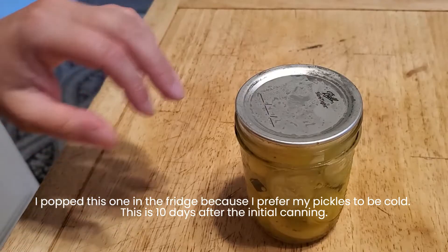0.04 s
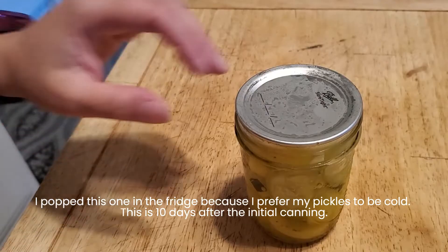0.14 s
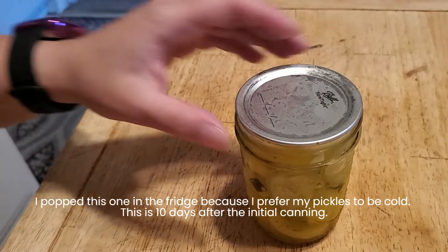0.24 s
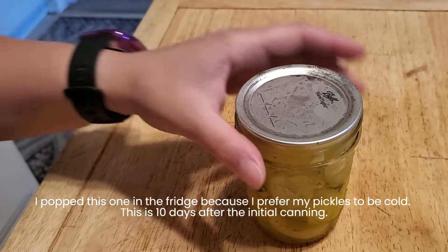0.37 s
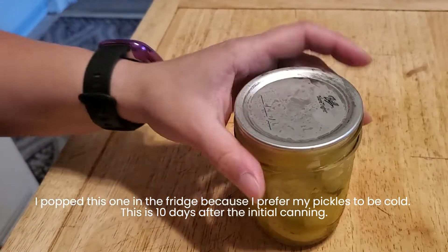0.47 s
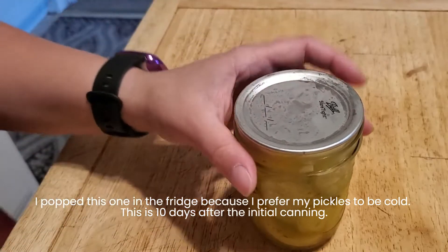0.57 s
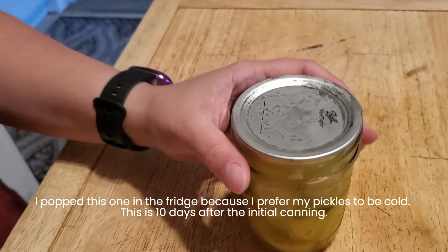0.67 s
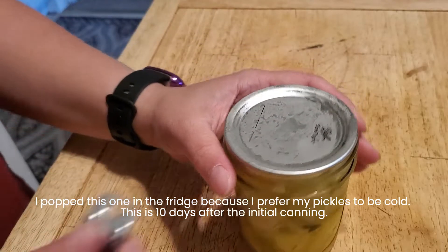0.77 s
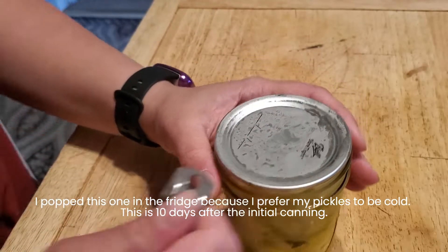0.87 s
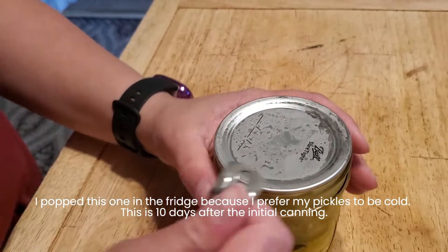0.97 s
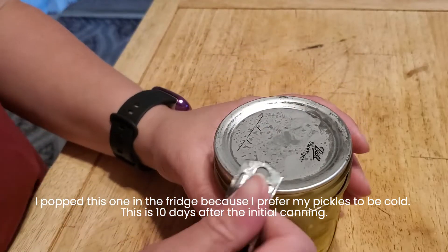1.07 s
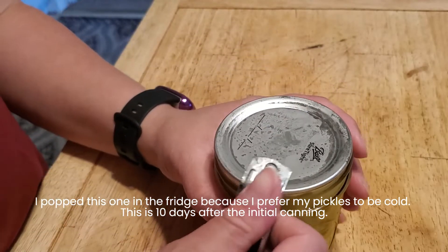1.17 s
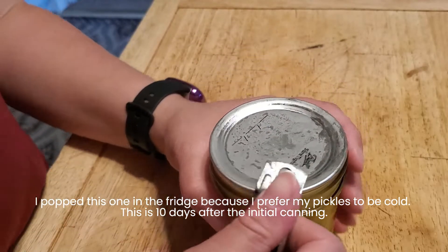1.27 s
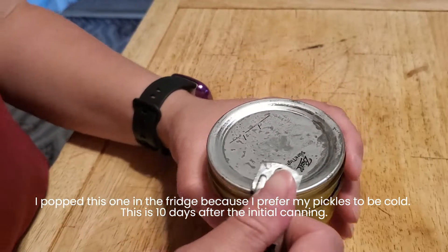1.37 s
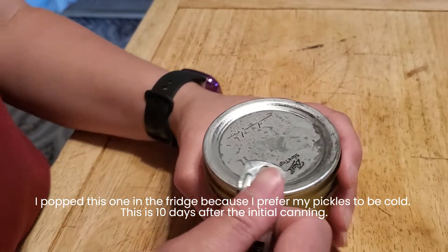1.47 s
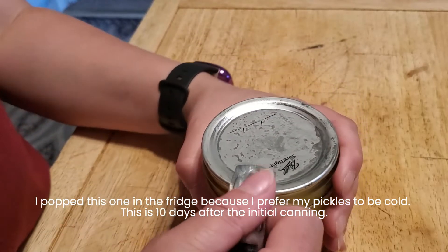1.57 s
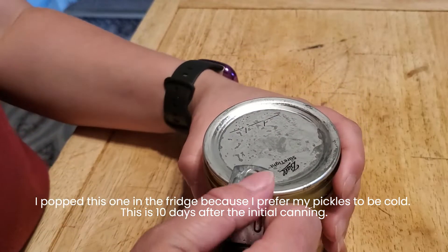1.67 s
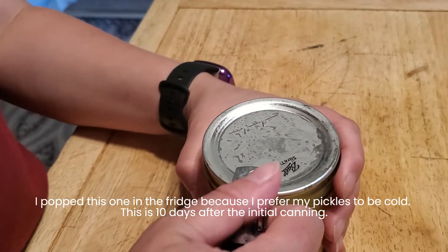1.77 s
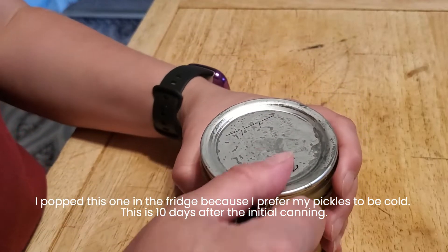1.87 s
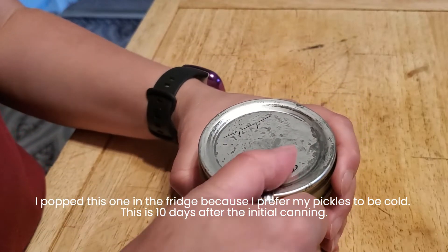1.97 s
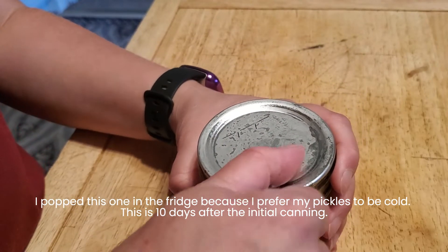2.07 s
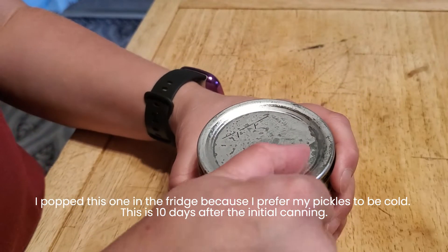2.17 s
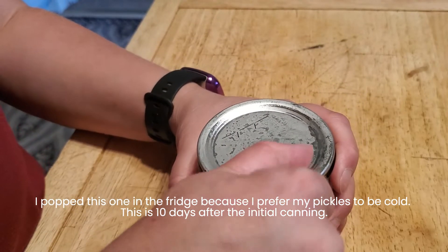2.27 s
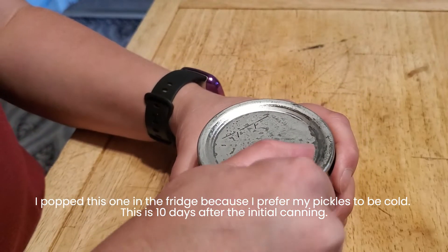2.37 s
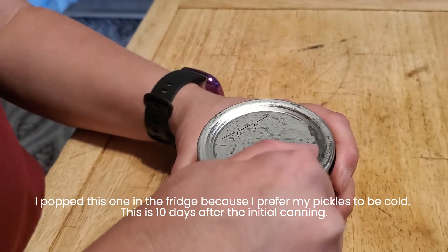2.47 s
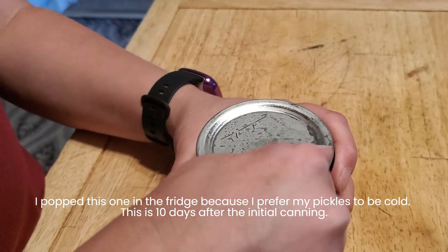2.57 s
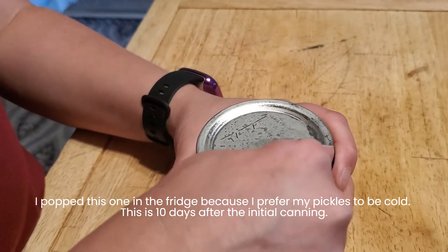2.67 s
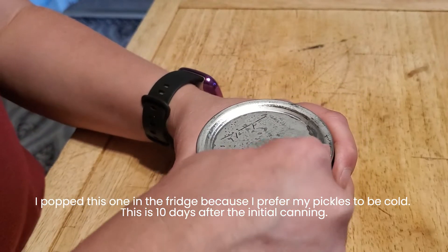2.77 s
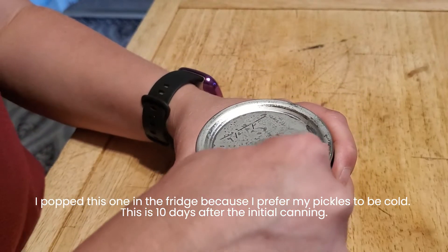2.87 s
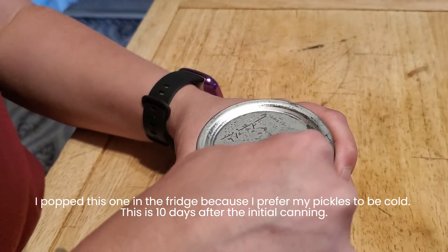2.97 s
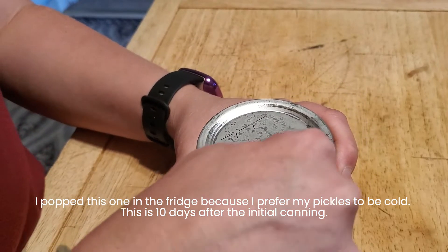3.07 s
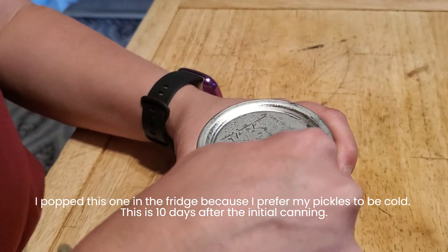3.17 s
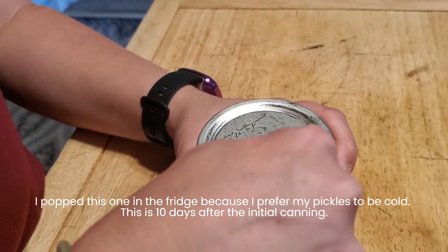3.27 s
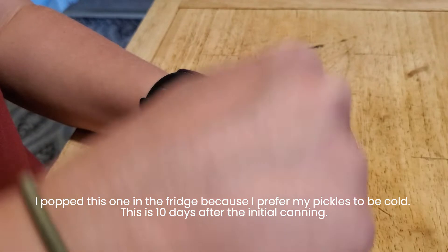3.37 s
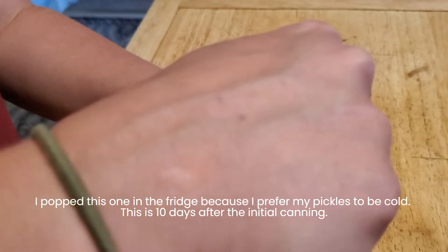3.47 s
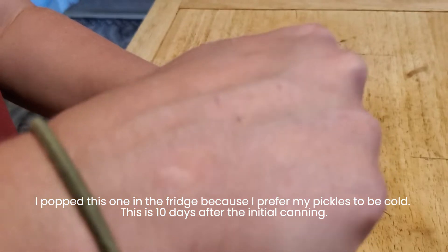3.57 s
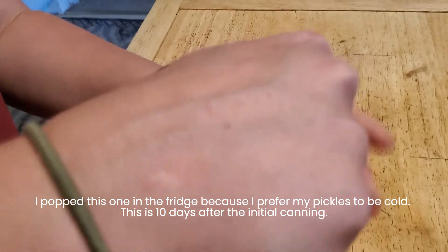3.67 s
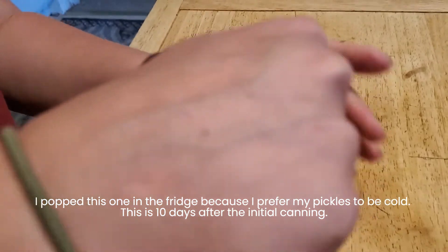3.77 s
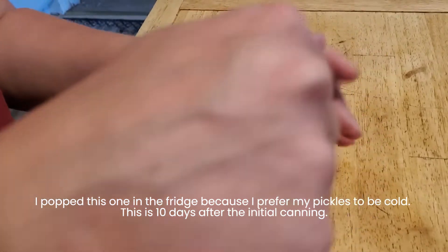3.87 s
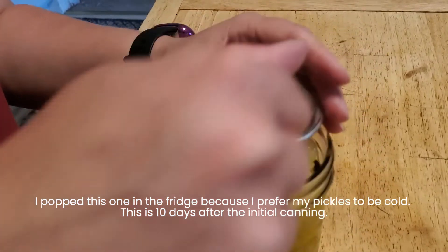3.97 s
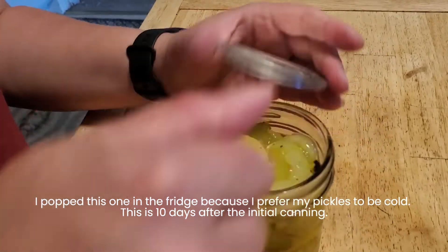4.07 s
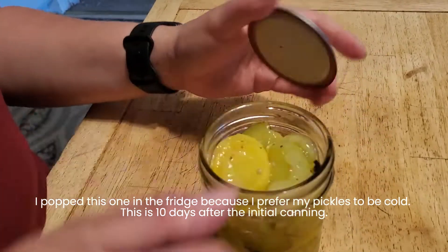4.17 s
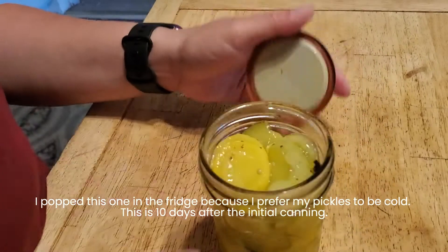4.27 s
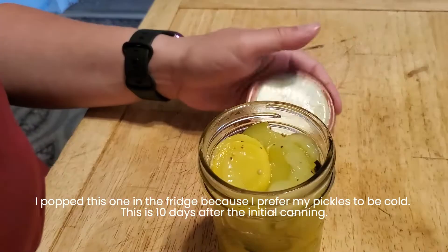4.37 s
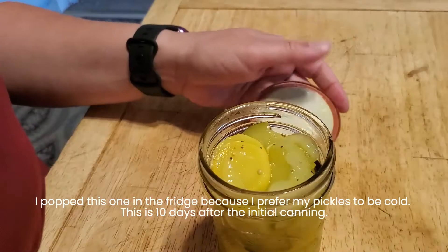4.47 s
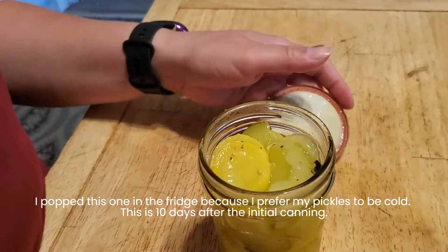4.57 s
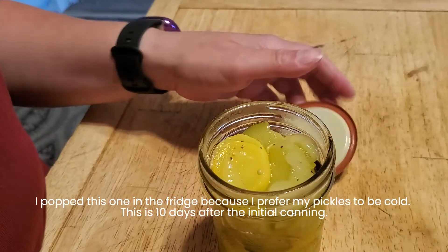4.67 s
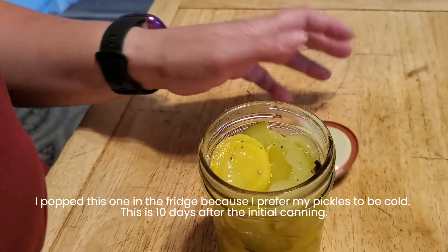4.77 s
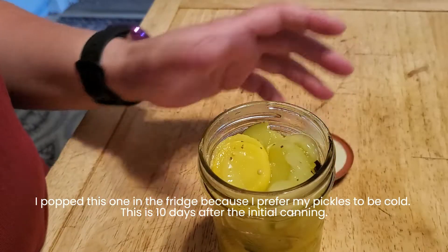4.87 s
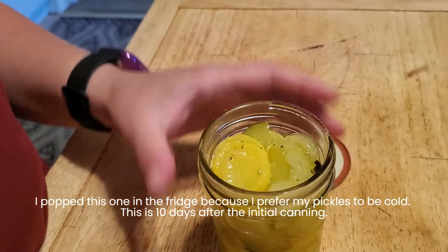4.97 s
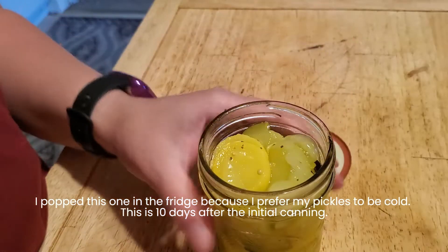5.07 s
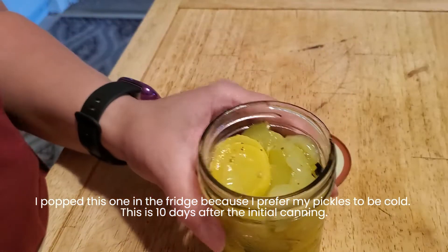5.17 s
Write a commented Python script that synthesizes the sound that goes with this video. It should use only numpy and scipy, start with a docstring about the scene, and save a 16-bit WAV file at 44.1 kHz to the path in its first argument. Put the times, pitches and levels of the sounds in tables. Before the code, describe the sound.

A steel opener clicks and scrapes on a glass jar's lid, which squeaks, pops open, then clatters on the rim and wobbles on wood.

```python
"""Cloth rustles, dull knocks and metal clicks follow, then a jar opens with a hiss, a squeak and a low pop.
A steel opener pries at the lid of a glass jar on a wooden table in a small kitchen, slipping on the rim.
The freed thin lid clatters on the glass, then wobbles on the table.
Knocks are short noise bursts plus ringing sine waves; rubbing and hissing are grainy noise;
the squeak is one sine wave with an unsteady, falling pitch. A low rush of noise lies under everything."""
import sys
import numpy as np
from scipy import signal
from scipy.fft import rfft, irfft, next_fast_len
from scipy.io import wavfile
from scipy.ndimage import map_coordinates

SR = 44100
rng = np.random.default_rng(int(sys.argv[2]) if len(sys.argv) > 2 else 0)


def master(y):
    """Save y as 16-bit WAV."""
    cut = np.clip(np.atleast_2d(y).T, -1, 1)
    pcm = np.round(cut * 32767)  # scale
    wavfile.write(sys.argv[1], SR, pcm.astype(np.int16))


N = 230773
TIME = np.arange(N) / SR  # s
AGE = np.arange(SR) / SR  # time since a blow, s

# Ringing notes of the lid: (frequency [Hz], level struck on glass [dB], level lying on wood [dB],
# time to fall 60 dB before each surface shortens it [s])
LID_MODES = [(838, -11, -22, .35), (1322, -15, -18, .35), (2048, -8, -30, .45), (2125, -4, -26, .4),
             (2168, -5, -20, .4), (2284, -8, -18, .3), (2668, -10, -6, .22), (2778, -11, -3, .22),
             (2898, -16, -7, .18), (3008, -11, -16, .4), (3140, 0, 0, .42), (3561, -9, -18, .5),
             (3707, -8, -16, .35), (4557, -8, -23, .38), (5175, -7, -22, .42), (5570, -4, -15, .3),
             (8183, -22, -36, .35), (8295, -20, -36, .38), (9422, -24, -40, .3), (10211, -16, -35, .36),
             (11932, -21, -32, .22), (13386, -20, -36, .22), (14567, -19, -38, .2)]
# Tone colour of the jar's dull sounds: (frequency [Hz], relative level [dB])
JAR_COLOUR = [(41, -34), (70, 2.5), (360, 2.5), (761, -5.5), (1340, -11.5), (1850, -23), (2480, -19.5),
              (2910, -34), (3570, -30.5), (5370, -47), (6750, -47), (14900, -63.5), (16000, -63.5)]
# Tone colour of rushing air, also lent to tiny cloth cracks: (frequency [Hz], relative level [dB])
AIR_COLOUR = [(900, -30.5), (2000, -11), (3000, -2), (4200, -10.5), (6600, -6), (7600, -16), (9000, -10),
              (11300, -14), (14000, -3.5), (16000, -7)]


def amp(db):
    """Turn decibels into gain."""
    return 10 ** (np.asarray(db) / 20)


def unit(x):
    """Scale x to an average strength (rms) of 1."""
    return x / np.sqrt(np.mean(x ** 2) + 1e-20)


def along(points, hz):
    """Read a curve of (frequency, value) points on a logarithmic frequency axis."""
    f, v = np.transpose(points)
    return np.interp(np.log(hz + 1), np.log(f + 1), v)


def waver(rate):
    """Draw a smooth random curve with this many random points a second."""
    knots = rng.standard_normal(int(N * rate / SR) + 4)
    return map_coordinates(knots, [TIME * rate])


def add(track, s, sound):
    """Mix a sound into the track from time s, in seconds."""
    start = max(round(s * SR), 0)
    part = sound[..., :max(N - start, 0)]
    track[:, start:start + part.shape[-1]] += part


def filtered(x, response):
    """Reshape x by a complex gain that depends on frequency."""
    m = next_fast_len(N + SR // 4)
    return irfft(rfft(x, m) * response(np.fft.rfftfreq(m, 1 / SR)), m)[:, :N]


def noise(colour, size=N, band=(20, SR)):
    """Coloured stereo noise of rms 1 in a soft-edged band; the bass is nearly the same on both sides."""
    # Likeness of left and right: (frequency [Hz], likeness [0 to 1])
    likeness = [(60, 0.97), (250, .97), (500, 0.61), (1000, 0.6), (3000, 0.27), (8000, 0.15)]
    m = next_fast_len(size)
    hz = np.fft.rfftfreq(m, 1 / SR)
    turn = np.arccos(np.clip(along(likeness, hz), -1, 1)) / 2
    gain = amp(along(colour, hz))
    gain = gain / (1 + (band[0] / (hz + 1)) ** 6) / (1 + (hz / band[1]) ** 6)
    shares = np.array([np.cos(turn), np.sin(turn)])
    mid, side = irfft(rfft(rng.standard_normal((2, m))) * gain * shares, m)[:, :size]
    return unit(np.array([mid + side, mid - side]))


def burst(colour, band, t60, rise):
    """Many crowded, quickly damped vibrations: noise that starts fast and dies away."""
    t = AGE[:SR // 4]
    fade = amp(-60 * t / t60) * (1 - np.exp(-t / rise))
    return unit(noise(colour, size=len(t), band=band) * fade) * np.sqrt(np.mean(fade ** 2))


def ring(modes, scatter_db, detune, spread):
    """Freely fading sine waves; strengths, pitches and left-right phases vary from blow to blow."""
    hz, db, t60 = np.transpose(modes)[:, :, None]
    luck = rng.standard_normal((3, len(modes), 1))
    gain = amp(db + scatter_db * luck[0])
    gain = gain / np.sqrt(np.sum(gain ** 2) / 2)
    fade = gain * amp(-60 * AGE / t60) * (1 - np.exp(-AGE / 0.00023))
    phase = 2 * np.pi * hz * (1 + detune * luck[1]) * AGE + rng.uniform(0, 2 * np.pi, hz.shape)
    return np.array([np.sum(fade * np.sin(phase + side * spread * luck[2]), 0) for side in (1, -1)])


def contacts(rows, colour, modes, clack_t60, thud_t60, tick_t60, crack_t60, crack_db, wood_db, choke_db,
             detune):
    """Each blow thuds, clacks, ticks and cracks; the struck thing rings until later blows choke it.

    Rows: (time [s], clack [dB], thud [dB], tick [dB], ring relative to clack [dB])."""
    # Ringing notes of the table top: (frequency [Hz], level [dB], time to fall 60 dB [s])
    wood_modes = [(171, -2, .14), (322, -4, .09), (431, 4, .12), (539, 1, .17), (660, -4, .11)]
    rebound = .008  # s within which a rebound belongs to the same blow
    out, rows = np.zeros((2, N)), np.array(list(rows))
    low, middle, high, top = (50, 800), (800, 3700), (4200, 9000), (8500, SR)  # Hz
    for s, clack, thud, tick, ring_db in rows:
        add(out, s, amp(thud) * burst(colour, low, thud_t60, rise=0.00052))
        add(out, s, amp(thud + wood_db) * ring(wood_modes, scatter_db=6.0, detune=0.014, spread=.1))
        add(out, s, amp(clack) * burst(colour, middle, clack_t60, rise=0.0017))
        add(out, s, amp(tick) * burst(colour, high, tick_t60, rise=0.001))
        add(out, s, amp(tick + crack_db) * burst(colour, top, crack_t60, rise=.0002))
        # Number of later blows so far
        later = np.searchsorted(rows[rows[:, 0] > s + rebound, 0], s + AGE)
        ring_gain = amp(clack + ring_db + choke_db * later)
        add(out, s, ring_gain * ring(modes, scatter_db=3, detune=detune, spread=.5))
    return out


def strokes(rows):
    """Gain of movements that gather speed and come to rest; rows as (time [s], dB, swell [s], fade [s])."""
    power = np.zeros(N)
    for s, db, swell, fade in rows:
        width = np.where(TIME < s, swell, fade)
        power += (amp(db) * np.exp(-((TIME - s) / width) ** 2)) ** 2
    return np.sqrt(power)


def rub(gain, colour, grain_rate, grain_db):
    """Friction or rushing air: noise broken up by quick random changes in level."""
    return gain * unit(noise(colour) * amp(grain_db * waver(grain_rate)))


def follow(clack, typical_db, share):
    """A level that is typical_db for an ordinary tap and changes by a share of the tap's extra strength."""
    tap_db = -20  # clack of an ordinary tap
    return typical_db + share * (clack - tap_db)


def dragging(s, db, rise, t60):
    """Gain of an edge that stays in touch after each tap and slows down."""
    power = np.zeros((1, N))
    for start, strength in zip(s, db):
        add(power, start, (amp(strength - 60 * AGE / t60) * (1 - np.exp(-AGE / rise))) ** 2)
    return np.sqrt(power)


def arm():
    """Cloth rustles and catches with a tiny crack as the arm reaches for the jar."""
    # Reaching movements: (time at the fastest [s], rustle [dB], swell [s], fade [s])
    reaches = [(.29, -51.5, 0.019, 0.024), (.42, -58.5, 0.9, 0.27), (.42, -52.5, 0.0065, 0.084),
               (.85, -57, 0.35, 0.21), (.92, -58.5, 0.16, 0.026)]
    # Cloth catching: (time [s], level [dB])
    snags = [(0.263, -45), (0.284, -38.5), (0.296, -48), (0.332, -46), (0.412, -46)]
    # Tone colour of cloth: (frequency [Hz], relative level [dB])
    cloth_colour = [(290, -42.5), (500, -4.5), (698, 2), (1130, -10.5), (2390, -9.5), (6510, -19.5),
                    (7640, -25.5), (14900, -22.5), (16000, -26)]
    out = rub(strokes(reaches), cloth_colour, grain_rate=250, grain_db=1.0)
    for s, db in snags:
        add(out, s, amp(db) * burst(cloth_colour, (500, SR), t60=0.02, rise=0.00054))
        add(out, s, amp(db - 2) * burst(AIR_COLOUR, (7000, SR), t60=.012, rise=.0003))
    return out


def jar():
    """The full, tightly held jar knocks dully; harder contacts tick more, the soft palm only thuds."""
    # Tool and lid shifting the jar: (time [s], thud [dB], hardness as clack relative to thud [dB])
    knocks = [(0.627, -44, -5), (1.324, -32.5, 0.5), (1.353, -30.5, -21.5), (2.08, -24, -3),
              (2.174, -23.5, 7.5), (2.266, -25.5, -2.5), (3.585, -42.5, -11.5)]
    # The palm pressing softly on the jar: (time [s], level [dB])
    presses = [(0.465, -41), (0.592, -34.5), (0.603, -47), (0.918, -41), (1.884, -43)]
    # Ringing notes of the jar rim: (frequency [Hz], level [dB], time to fall 60 dB [s])
    rim_modes = [(920, -5, .13), (1335, 0, .2), (1440, -3, .18)]
    tick_db, tick_grows, ring_db = -33, 3.7, -25  # tick re thud, dB of tick per dB of hardness, ring re clack
    rows = [(s, thud + hard, thud, thud + tick_db + tick_grows * hard, ring_db) for s, thud, hard in knocks]
    out = contacts(rows, JAR_COLOUR, rim_modes, clack_t60=.026, thud_t60=0.062, tick_t60=0.0094,
                   crack_t60=0.0079, crack_db=-14, wood_db=-8, choke_db=-5, detune=0.0073)
    for s, db in presses:
        add(out, s, amp(db) * burst(JAR_COLOUR, (85, 240), t60=0.16, rise=.004))
    return out


def opener():
    """The steel tool hooks under the lid, scrapes along the rim and slips off with clicks."""
    # Opener on the lid: (time [s], clack [dB], thud [dB], tick [dB], ring relative to clack [dB])
    pries = [(1.2115, -17.5, -33.5, -26.5, -39.5), (1.215, -24, -25.5, -26, -36.5),
             (1.6575, -14, -12.5, -18, -10.5), (1.6605, -8.5, -13.5, -26.5, -17),
             (1.731, -34, -31.5, -62, -31), (2.015, -49, -62, -50, -11), (3.094, -55, -38, -62.5, -25)]
    # The hook biting under the rim: (time at the fastest [s], scratch [dB], swell [s], fade [s])
    bites = [(1.225, -45, 0.00617, 0.079)]
    # The opener sliding along the rim: (time at the fastest [s], scrape [dB], swell [s], fade [s])
    slides = [(1.34, -33.5, .052, .033), (1.656, -29.5, .004, .004)]
    # Ringing notes when the opener strikes: (frequency [Hz], level [dB], time to fall 60 dB [s])
    tool_modes = [(900, -11, .18), (2430, 0, .2), (2470, -4, .22), (2512, -3, .33), (3432, -2, .18),
                  (4390, -22, .25), (5720, -23, .25)]
    # Tone colour of the tool's blows: (frequency [Hz], relative level [dB])
    tool_colour = [(50, -19), (105, -3.5), (170, 2), (230, -7), (330, 1), (480, 1), (740, -4.5), (930, 3.5),
                   (1200, -11), (1900, -14), (2450, -12.5), (2900, -12.5), (3450, -10.5), (4000, -22),
                   (5100, -13), (6200, -25.5), (15500, -42)]
    # Tone colour of the slides: (frequency [Hz], relative level [dB])
    scrape_colour = [(59, -39), (100, -8), (157, 0), (460, -3.5), (565, -24.5), (657, -1.5), (764, -14.5),
                     (922, -12.5), (1400, -15), (1590, -25), (1920, -22), (9000, -48.5), (11700, -47.5),
                     (19800, -120)]
    clicks = contacts(pries, tool_colour, tool_modes, clack_t60=.025, thud_t60=0.034, tick_t60=0.023,
                      crack_t60=0.0091, crack_db=-3.0, wood_db=-11, choke_db=-2.5, detune=0.0018)
    scratch = strokes(bites) * noise(tool_colour, band=(3300, 7000))
    scrape = rub(strokes(slides), scrape_colour, grain_rate=260, grain_db=-1.0)
    return clicks + scratch + scrape


def squeak():
    """The slipping rubber seal squeaks faintly, then louder; its unsteady pitch sags as the gap opens."""
    # Slips of the seal: (time at the loudest [s], pitch at that time [Hz], level [dB], swell [s])
    slips = [(3.097, 2136, -38.5, 0.0019), (3.3605, 2318, -22.5, .011)]
    fade, sag = 0.0043, 13  # s, octaves per second
    out = np.zeros((2, N))
    for s, hz, db, swell in slips:
        since = np.clip(TIME - s, -.05, .05)
        pitch = hz * 2 ** (-sag * since) * (1 + .05 * waver(900))
        out += strokes([(s, db, swell, fade)]) * np.sin(2 * np.pi * np.cumsum(pitch) / SR)
    return out


def seal():
    """Air rushes in ever faster through the widening gap, then the lid lets go with a low pop."""
    # Notes of the air over the brine: (frequency [Hz], level [dB], time to fall 60 dB [s])
    pop_modes = [(87.6, -20.5, 0.091), (147.4, -25, .06), (290, -34, 0.1)]
    leak_s, pop_s = 3.303, 3.374  # the seal first gapes; the lid lets go
    leak_db, growth = -24, 385  # hiss at the pop [dB], its growth [dB per second]
    gape, leak_fade = .014, .004  # s
    onset = np.clip((TIME - leak_s) / gape, 0, 1)
    gap = onset * amp(growth * np.minimum(TIME - pop_s, 0))
    flow = amp(leak_db) * gap * np.exp(-np.maximum(TIME - pop_s, 0) / leak_fade)
    hiss = rub(flow, AIR_COLOUR, grain_rate=330, grain_db=1.5)
    out = hiss + amp(-11.5) * flow * noise(JAR_COLOUR, band=(60, 500))
    pop = -sum(amp(db - 60 * AGE / t60) * np.sin(2 * np.pi * hz * AGE) for hz, db, t60 in pop_modes)
    add(out, pop_s, pop)
    add(out, 3.362, amp(-30.0) * burst(JAR_COLOUR, (70, 350), t60=0.2, rise=0.0031))  # the jar recoils
    add(out, pop_s, amp(-31) * burst(JAR_COLOUR, (400, 4000), t60=.09, rise=0.0034))
    return out


def lid_on_glass():
    """The freed lid taps and grazes the mouth of the jar; closing fingers still it, then let go."""
    # Lid on the glass rim: (time [s], clack [dB], tick relative to clack [dB])
    clatter = [(3.615, -20, -9.5), (3.671, -9, -3), (3.713, -14.5, -15.5), (3.748, -12, -8),
               (3.751, -11.5, 2), (3.791, -17, 1.5), (3.797, -21, 6), (3.823, -18, 0), (3.897, -29, -1),
               (3.912, -24.5, 3.5), (3.921, -22, -3), (3.937, -26.5, 0), (4.44, -56.5, 13.5)]
    # Tone colour of the rim: (frequency [Hz], relative level [dB])
    rim_colour = [(47, -54), (80, -10.5), (178, 0), (702, -22.5), (820, -1.5), (1200, -15), (2180, 3.5),
                  (2840, -5), (3100, -2), (3320, -7), (3620, -5), (4830, -13.5), (5520, -1.5),
                  (7200, -25.5), (16000, -28)]
    grip_s, let_go_s, closing, grip_db = 3.96, 4.42, 0.11, -39  # s, s, s, dB
    hz, db, _, t60 = np.transpose(LID_MODES)
    s, clack, bright = np.transpose(clatter)
    thud = follow(clack, typical_db=-35.0, share=1.0)
    ring_db = follow(clack, typical_db=-9, share=-0.12)
    rows = zip(s, clack, thud, clack + bright, ring_db)
    taps = contacts(rows, rim_colour, np.c_[hz, db, .9 * t60], clack_t60=0.026, thud_t60=0.074,
                    tick_t60=0.04, crack_t60=0.019, crack_db=-5.0, wood_db=-12.5, choke_db=-5.0,
                    detune=0.00089)
    grip = amp(grip_db * np.clip((TIME - grip_s) / closing, 0, 1) * (TIME < let_go_s))
    graze = dragging(s, follow(clack, typical_db=-33, share=.45), rise=0.0041, t60=0.19)
    graze = graze * (TIME < let_go_s)
    rumble = amp(-11.5) * graze * noise(JAR_COLOUR, band=(90, 350))  # the grazing shakes the jar
    return grip * (taps + rumble + rub(graze, rim_colour, grain_rate=370, grain_db=1.0))


def lid_on_table():
    """The lid rocks on the wood, which damps its ringing; its edge rolls on after each tap."""
    # Lid on the table: (time [s], clack [dB], tick relative to clack [dB], ring relative to clack [dB])
    wobble = [(4.679, -28.5, -5.5, -3.5), (4.699, -31.5, -10, 0), (4.715, -24.5, -4.5, 0.5),
              (4.817, -14, -2, 0), (4.823, -14, -8, -30), (4.89, -28.5, -2.5, 2), (4.914, -22, -10.5, -0.5),
              (4.92, -16.5, -4.5, -43), (5.002, -19, -14, -0.5), (5.004, -19, -12.5, -3),
              (5.016, -27.5, -12.5, -19), (5.069, -19, -6.5, -4), (5.085, -22.5, -10.5, -21),
              (5.135, -22.5, -14.5, -3.5), (5.181, -16, -8.5, -8), (5.212, -19, -6, -30)]
    # Tone colour of lid on wood: (frequency [Hz], relative level [dB])
    table_colour = [(80, -20), (300, -21), (800, -20), (1000, -16.5), (1350, -11.5), (1800, -17),
                    (2400, -1.5), (2780, 6), (3100, 1), (3900, -20.5), (5500, -12.5), (7700, -35.5),
                    (12000, -32), (16000, -33)]
    hz, _, db, t60 = np.transpose(LID_MODES)
    s, clack, bright, ring_db = np.transpose(wobble)
    thud = follow(clack, typical_db=-39.5, share=0.086)
    rows = zip(s, clack, thud, clack + bright, ring_db)
    taps = contacts(rows, table_colour, np.c_[hz, db, .6 * t60], clack_t60=0.044, thud_t60=0.097,
                    tick_t60=0.067, crack_t60=0.017, crack_db=-10.0, wood_db=-24, choke_db=-1.5,
                    detune=0.002)
    roll = dragging(s, follow(clack, typical_db=-27.5, share=.8), rise=.008, t60=0.2)
    return taps + rub(roll, table_colour, grain_rate=140, grain_db=3.5)


def room(x, balance, wet_db):
    """Place a source left or right and add the kitchen's echo, whose high treble dies soonest."""
    # How long the kitchen rings: (frequency [Hz], time to fall 60 dB [s])
    echo_times = [(100, 0.39), (500, 0.33), (2500, 0.37), (6000, 0.26), (14000, 0.27)]
    hz, t, z = signal.stft(noise([(100, 0), (10000, 0)], size=SR // 2), SR, nperseg=256)
    tail = signal.istft(z * amp(-60 * t / along(echo_times, hz)[:, None]), SR, nperseg=256)[1]
    tail *= 1 - np.exp(-(np.arange(tail.shape[1]) / SR / 0.0016) ** 2)  # the walls take a moment to reply
    direct = filtered(x, lambda hz: amp(np.outer([.5, -.5], along(balance, hz))))
    echo = signal.fftconvolve(x, tail / np.linalg.norm(tail[0]), axes=1)[:, :N]
    return direct + amp(wet_db) * echo


def scene():
    """Cloth, jar, tool and lid over the kitchen's low rush; the small jar gives off little deep bass."""
    # Tone colour of the kitchen's rush: (frequency [Hz], relative level [dB])
    rush_colour = [(15, -61.5), (25, -26.5), (36, -15), (48, -7), (97, 0), (134, -5), (373, -4.5),
                   (405, -14.5), (659, -16.5), (988, -27.5), (1440, -31), (4030, -39), (5000, -43),
                   (11600, -52), (16000, -43)]
    # Where the tool, the rim and the table sit: (frequency [Hz], left minus right [dB])
    at_tool = [(60, 1), (250, -0.5), (600, 2.5), (3000, 0.5), (15000, 0.5)]
    at_rim = [(60, -4), (600, 1.5), (2200, -5), (3300, -1), (4500, 5.5), (5600, 6), (7200, 5), (15000, -3)]
    at_table = [(60, -1.5), (180, -1.5), (550, 3), (1650, -6), (4970, 3.5), (15000, -5)]
    # Thin out what lies below about 70 Hz
    knocks = filtered(opener() + jar(), lambda hz: (1j * hz) ** 2 / ((1j * hz + 70) ** 2 - 1j * hz * 70))
    prying = room(knocks, at_tool, wet_db=-8.0)
    release = room(seal(), at_tool, wet_db=-8.0) + room(squeak(), at_rim, wet_db=-13)
    lid = room(lid_on_glass(), at_rim, wet_db=-11) + room(lid_on_table(), at_table, wet_db=-10.5)
    return amp(-51.5) * noise(rush_colour) + arm() + prying + release + lid


def record(dry):
    """The microphone hears left a little later, sheds deep bass, rounds peaks and cuts the top treble."""
    lag, ceiling, top_hz = .00009, .85, 15900  # s, sample value, Hz
    ports = lambda hz: np.exp(-2j * np.pi * lag * np.outer([.5, -.5], hz))
    heard = filtered(dry, lambda hz: ports(hz) * (1j * hz / (1j * hz + 38)) ** 2)
    rounded = heard / (1 + (heard / ceiling) ** 6) ** (1 / 6)
    return filtered(rounded, lambda hz: hz < top_hz)


dry = scene()
out = record(dry)
master(out)
```